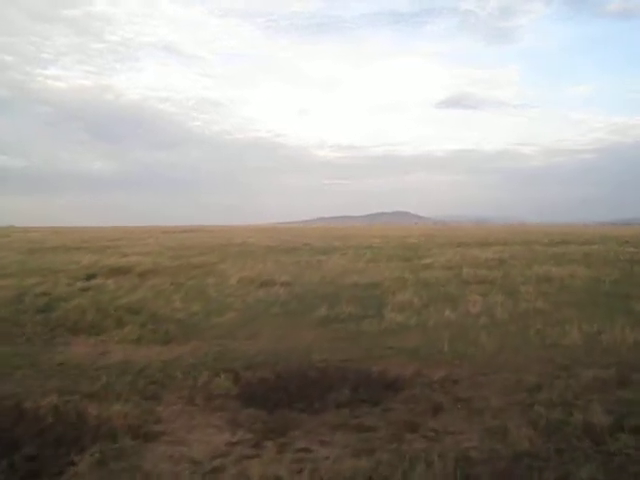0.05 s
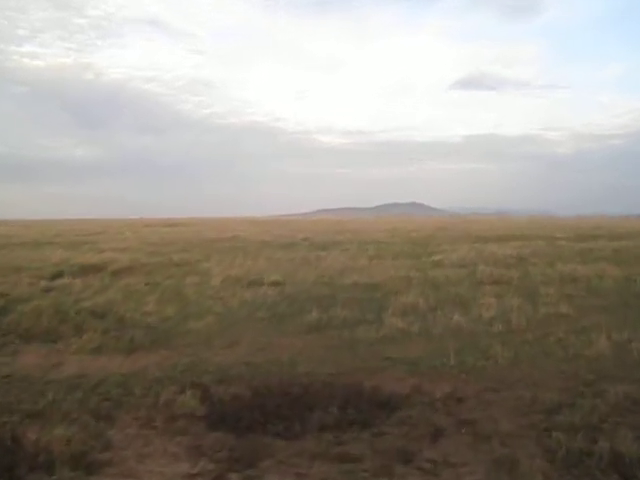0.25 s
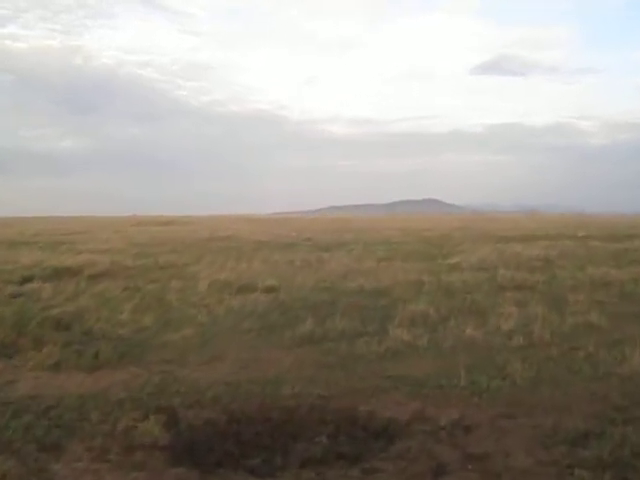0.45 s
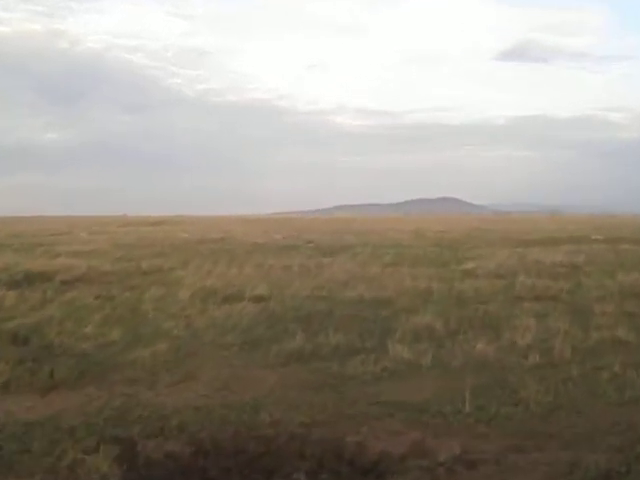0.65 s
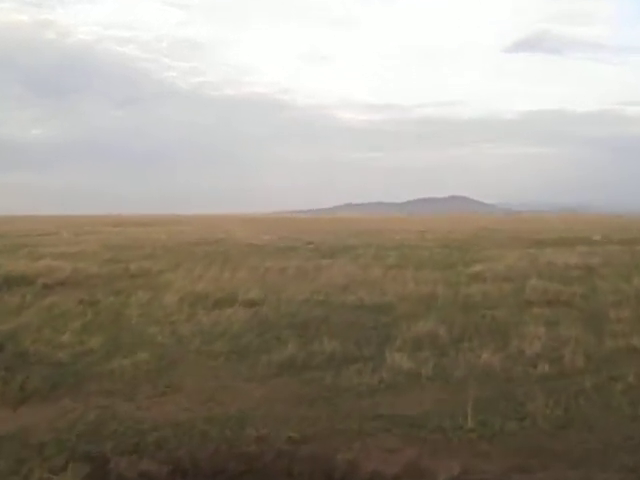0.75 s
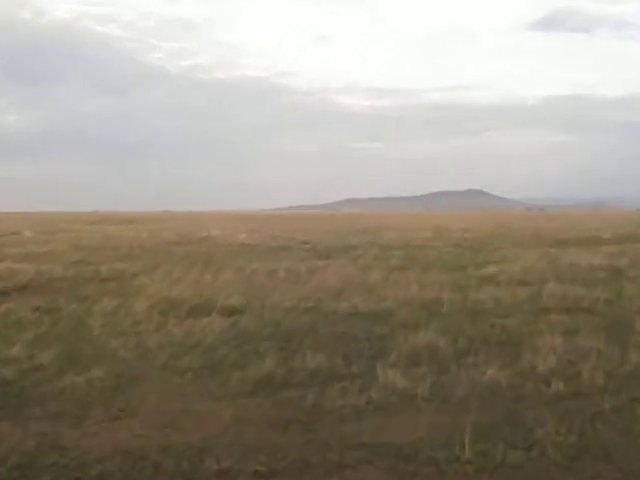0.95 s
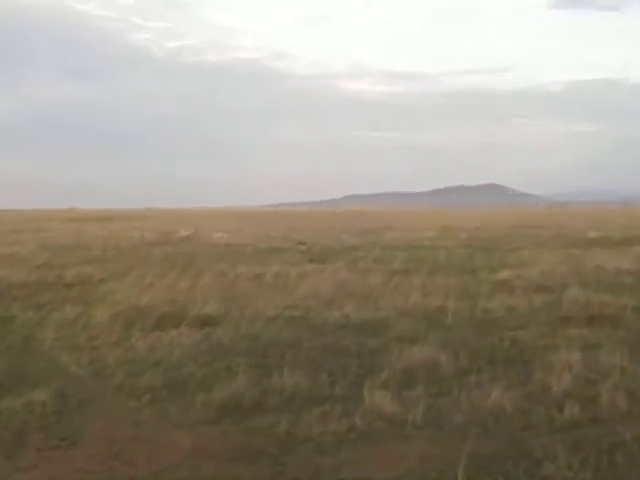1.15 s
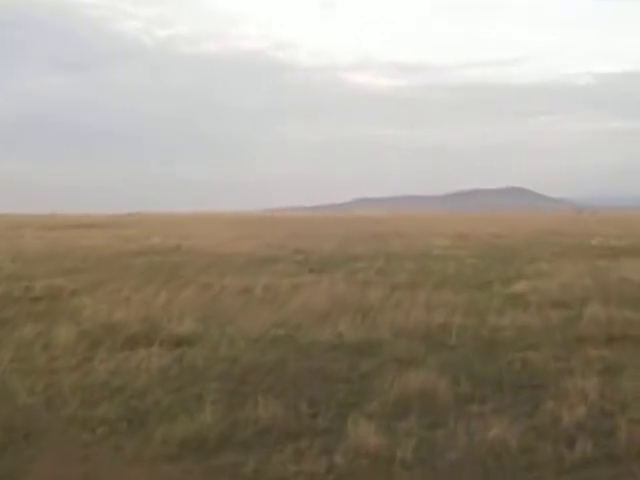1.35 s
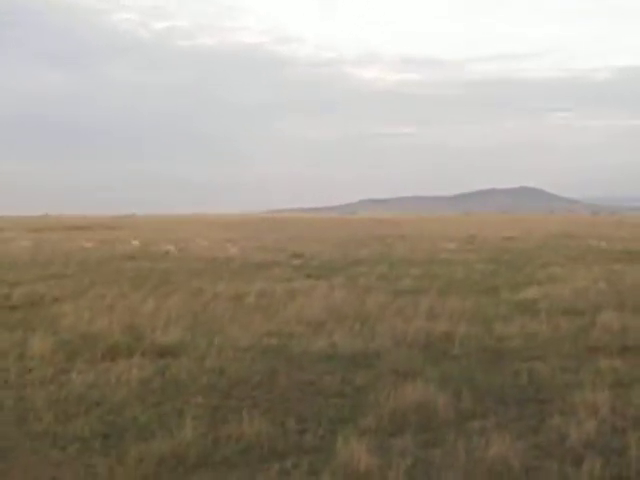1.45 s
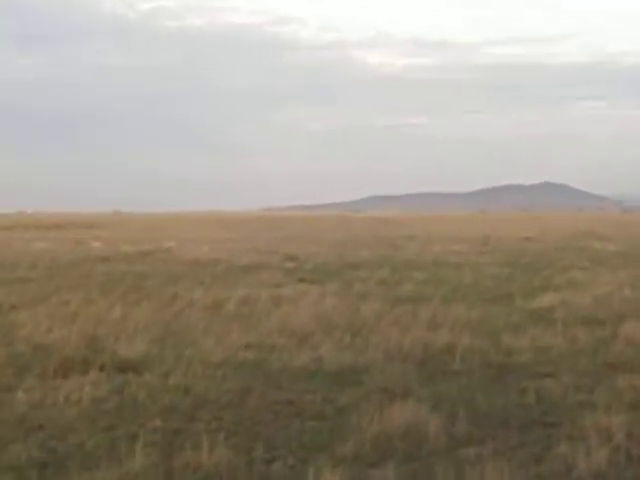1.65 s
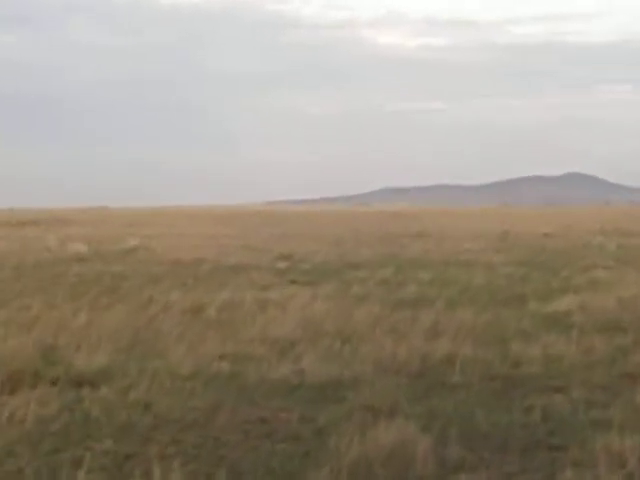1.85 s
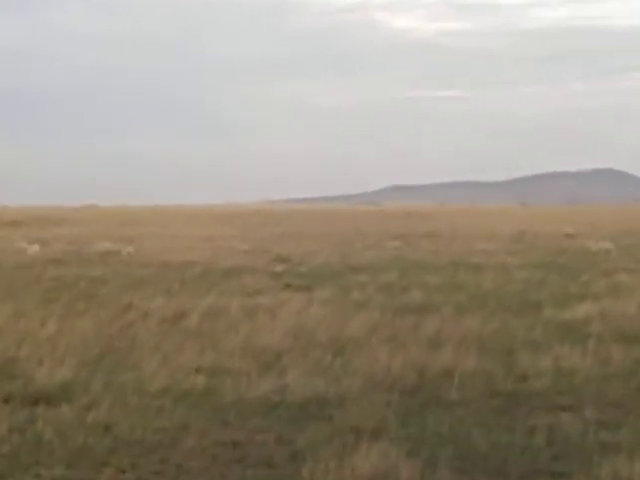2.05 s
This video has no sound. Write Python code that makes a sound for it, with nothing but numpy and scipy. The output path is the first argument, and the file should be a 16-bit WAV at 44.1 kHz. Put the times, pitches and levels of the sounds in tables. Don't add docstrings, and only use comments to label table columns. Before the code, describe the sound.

A gas burner fires close overhead in a balloon over open grassland: faint ticks, sharp ignition bang and thud, loud steady low roar with jet hiss, then a quick fade to quiet, slightly overloaded close microphone.

```python
import sys
import numpy as np
from scipy import signal
from scipy.fft import rfft, irfft
from scipy.io import wavfile

SR = 44100
rng = np.random.default_rng(int(sys.argv[2]) if len(sys.argv) > 2 else 0)


def convert_level_to_amplitude(level_db):
    exponent = np.asarray(level_db, float) / 20
    return 10 ** exponent


def unload_wav(signal):
    wavfile.write(
        sys.argv[1],
        SR,
        np.round(np.clip(np.atleast_2d(signal).T, -1, 1) * 32767).astype(np.int16),
    )


N = 92610
T = np.arange(N) / SR


def rms_one(x):
    return x / np.sqrt(np.mean(x ** 2) + 1e-20)


def drift(rate_hz):
    r = np.exp(-80 * np.pi * rate_hz / SR)
    slow = signal.lfilter([1], [1, -2 * r, r * r], rng.standard_normal(N // 40 + 2002))[2000:]
    return np.interp(np.arange(N) / 40, np.arange(len(slow)), rms_one(slow - slow.mean()))


def peak(x, hz, width_hz, boost_db):
    r = np.exp(-np.pi * width_hz / SR)
    resonator = [1, -2 * r * np.cos(2 * np.pi * hz / SR), r * r]
    band = signal.lfilter(np.array([1, 0, -1]) * (1 - r * r) / 2, resonator, x)
    return x + (convert_level_to_amplitude(boost_db) - 1) * band


def coloured(source, spectrum):
    hz = np.maximum(np.fft.rfftfreq(N, 1 / SR), 1)
    point_hz, point_db = np.transpose(spectrum)
    return irfft(rfft(source) * convert_level_to_amplitude(np.interp(np.log(hz), np.log(point_hz), point_db)), N)


def band_noise(noise, order, low_hz, high_hz):
    sos = signal.butter(order, [low_hz, high_hz], "band", fs=SR, output="sos")
    return rms_one(signal.sosfilt(sos, noise))


def bands(x, gain_db):
    spectrum = rfft(x)
    position = 2 * np.log2(np.maximum(np.fft.rfftfreq(N, 1 / SR), 1) / 16)
    out = 0
    for k, hz in enumerate(16 * 2 ** np.arange(0, 10.6, .5)):
        window = np.cos(np.pi / 2 * np.clip(position - k, -1, 1)) ** 2
        out = out + convert_level_to_amplitude(gain_db(hz)) * irfft(spectrum * window, N)
    return out


# pitch_hz [Hz], width_hz [Hz], boost_db [dB]
AIR_SPACES = [(55, 15, 2.5), (148, 30, 5), (237.3, 41, 3.5), (345, 38, 5), (450, 40, -7.5), (530, 92, 2.5),
              (651, 65, 3), (762, 100, -3), (88.6, 28, -6.5), (2880, 600, 1)]


def through_air_spaces(x):
    for hz, width_hz, boost_db in AIR_SPACES:
        x = peak(x, hz, width_hz, boost_db)
    return rms_one(x)


# pitch_hz [Hz], density_db [dB per Hz]
ROAR_SPECTRUM = [(15, -43), (25, -21), (49, -3.5), (225, -1.5), (344, -6), (441, -7.5), (567, -4.5),
                 (728, -12), (2500, -28), (3250, -54), (5500, -120)]


def flame_roar():
    puffs_per_s, spread_db, puff_share = 1500, 2.5, .45
    puff_size = convert_level_to_amplitude(spread_db * np.minimum(rng.exponential(1, N), 4))
    puffs = (rng.random(N) < puffs_per_s / SR) * puff_size * rng.choice([-1, 1], N)
    fire = puff_share * rms_one(puffs) + (1 - puff_share) * rng.standard_normal(N)
    return through_air_spaces(coloured(fire, ROAR_SPECTRUM))


# pitch_hz [Hz], density_db [dB per Hz]
JET_SPECTRUM = [(880, -5), (1500, -6.5), (2030, -9), (2450, -6.5), (3190, -3), (8230, -16), (11100, -12.5),
                (13800, -17), (15500, -21.5)]


def jet_hiss():
    return through_air_spaces(coloured(rng.standard_normal(N), JET_SPECTRUM))


# time_s [s], flame_db [dB], jet_db [dB]
BLAST_LEVELS = [(.3, -21, -45), (.33, -19, -44), (.4, -19, -42.5), (.82, -19.5, -42.5), (1.0, -20, -45.5),
                (1.32, -20, -49), (1.47, -20.5, -52.5), (1.64, -22, -54), (1.82, -25.5, -62.5),
                (1.88, -29.5, -67), (1.94, -35, -73), (1.95, -43, -74), (2.02, -54, -86.5)]


def blast():
    roar_gain_db, jet_gain_db = .4, 9.0
    valve_s, jet_rise_s, cold_jet_db = .22, .07, -10.5
    light_s, light_rise_s = .238, .012
    jet_from_hz, jet_full_hz = 1070, 7200
    gust_db, flutter_db, patch_db = .5, .6, .6

    time_s, flame_db, jet_db = np.transpose(BLAST_LEVELS)
    flame_db = np.interp(T, time_s, flame_db, right=-120)
    jet_db = np.interp(T, time_s, jet_db, right=-120)
    flame_db += 20 * np.log10(np.clip((T - light_s) / light_rise_s, 1e-4, 1))
    jet_db += np.interp(T, [valve_s - .004, valve_s, valve_s + jet_rise_s], [-60, cold_jet_db, 0])
    flame_ref, jet_ref = np.median(flame_db), np.percentile(jet_db, 70)
    flutter = gust_db * drift(8.) + flutter_db * drift(40.)

    def follow(hz):
        share = np.clip(np.log(hz / jet_from_hz) / np.log(jet_full_hz / jet_from_hz), 0, 1)
        level_db = (1 - share) * (flame_db - flame_ref) + share * (jet_db - jet_ref)
        return level_db + flutter + patch_db * drift(14.)

    roar = convert_level_to_amplitude(flame_ref + roar_gain_db) * flame_roar()
    hiss = convert_level_to_amplitude(jet_ref + jet_gain_db) * jet_hiss()
    return bands(roar + hiss, follow)


def crackle():
    swell = np.interp(T, [.2381, .259, .2656], [0, 1, 0]) ** .77
    out = 0
    for low_hz, high_hz, level_db in ((180, 700, 1), (700, 1620, -12), (1620, 6000, -23),
                                      (7000, 15000, -35)):
        out = out + convert_level_to_amplitude(level_db) * band_noise(rng.standard_normal(N), 3, low_hz, high_hz)
    return convert_level_to_amplitude(-11) * swell * out


def final_bang():
    start_s, suck_s, push_s, level_db = .2612, .00231, .0044, -5
    suck = np.sin(np.pi * np.clip((T - start_s) / suck_s, 0, 1))
    push = np.sin(np.pi * np.clip((T - start_s - suck_s) / push_s, 0, 1))
    return convert_level_to_amplitude(level_db) * (push - suck)


def thud_and_ring():
    build_s = .024
    out = np.zeros(N)
    for peak_s, hz, level_db, t60_s in ((.32, 50.4, -17.5, .26), (.2635, 138, -12, .2)):
        after_s = T - peak_s
        build = np.clip(1 + after_s / build_s, 0, 1)
        decay = convert_level_to_amplitude(level_db - 60 * np.maximum(after_s, 0) / t60_s)
        out += build * decay * np.sin(2 * np.pi * hz * after_s)
    return out


# start_s [s], peak_db [dB]
VALVE_TICKS = [
    (0.1171, -46.5),
    (0.195, -49),
]


def valve_ticks():
    rise_s, t60_s = .003, .083
    noise = band_noise(rng.standard_normal(N), 2, 5500, 14000)
    envelope = np.zeros(N)
    for start_s, peak_db in VALVE_TICKS:
        rise = np.clip((T - start_s) / rise_s, 0, 1)
        envelope += rise * convert_level_to_amplitude(peak_db - 7.5 - 60 * np.maximum(T - start_s, 0) / t60_s)
    return noise * envelope


# pitch_hz [Hz], density_db [dB per Hz]
PILOT_SPECTRUM = [(12, -33), (20, 7.5), (342, 0.5), (1580, -9.5), (1920, -3.5), (2690, -8.5), (3760, -5.5),
                  (6030, -18.5), (15500, -27.5)]
# pitch_hz [Hz], density_db [dB per Hz]
AFTER_SPECTRUM = [(20, -10), (110, 0), (600, -15), (1000, -24), (2100, -24), (3500, -29), (5500, -39),
                  (15500, -51)]
# pitch_hz [Hz], width_hz [Hz], boost_db [dB]
WHISTLES = [(1300, 300, 4), (2080, 150, 3), (3150, 150, 3), (3700, 300, 4), (5200, 300, 3)]


def unsteady_air(spectrum):
    return rms_one(bands(coloured(rng.standard_normal(N), spectrum), lambda hz: 1.9 * drift(20.)))


def background():
    fade = np.interp(T, [.3, 1.5], [1, 0])
    before = convert_level_to_amplitude(-48 - .7) * unsteady_air(PILOT_SPECTRUM)
    after = convert_level_to_amplitude(-46.5 - 1.5) * unsteady_air(AFTER_SPECTRUM)
    air = fade * before + (1 - fade) * after
    for hz, width_hz, boost_db in WHISTLES:
        air = peak(air, hz, width_hz, boost_db)
    return air


def scene():
    ignition = crackle() + final_bang() + thud_and_ring()
    return (blast() + ignition + valve_ticks() + background())[None]


def roll_off(x):
    return signal.sosfilt(signal.butter(12, 15690, fs=SR, output="sos"), x)


def record(dry):
    overload, cutoff_hz = .75, 16600
    rounded = dry / (1 + np.abs(dry / overload) ** 6) ** (1 / 6)
    top_cut = signal.cheby2(14, 70, cutoff_hz, fs=SR, output="sos")
    mix = signal.sosfilt(top_cut, rounded)
    return roll_off(mix)


dry = scene()
out = record(dry)
unload_wav(out)
```